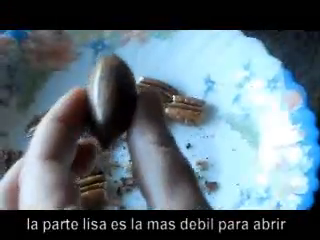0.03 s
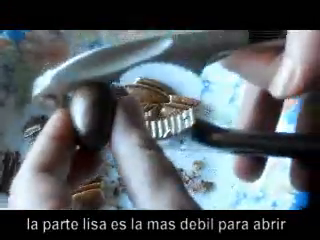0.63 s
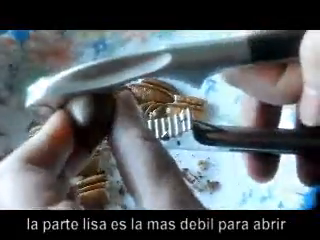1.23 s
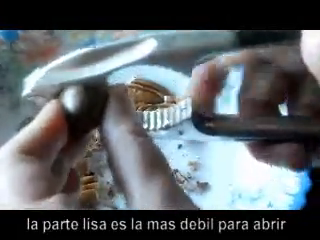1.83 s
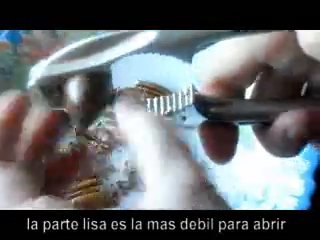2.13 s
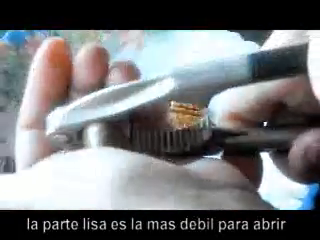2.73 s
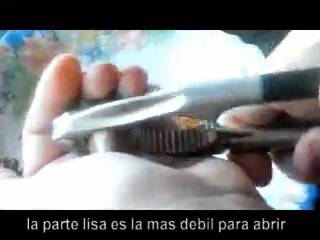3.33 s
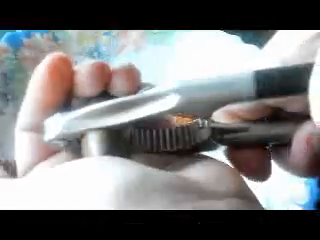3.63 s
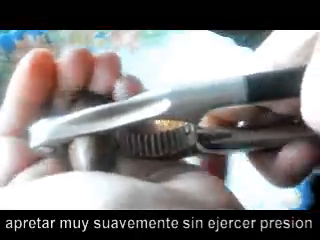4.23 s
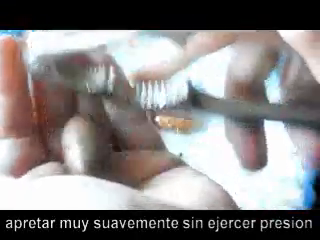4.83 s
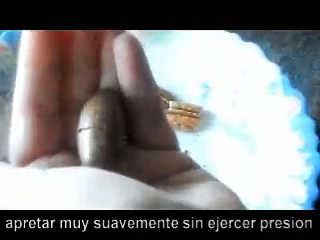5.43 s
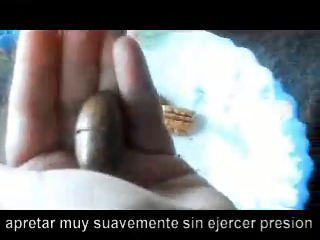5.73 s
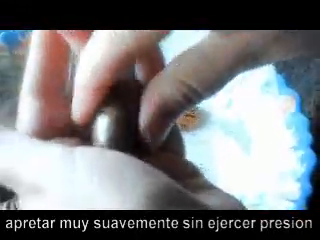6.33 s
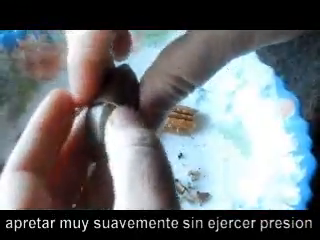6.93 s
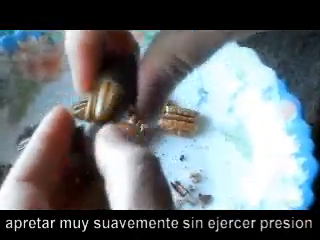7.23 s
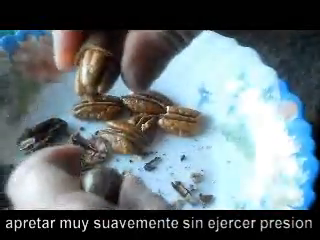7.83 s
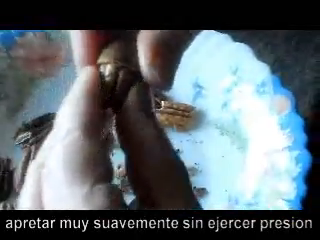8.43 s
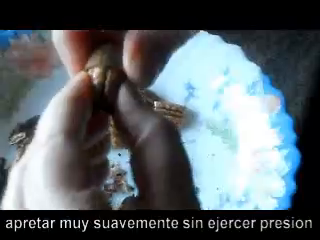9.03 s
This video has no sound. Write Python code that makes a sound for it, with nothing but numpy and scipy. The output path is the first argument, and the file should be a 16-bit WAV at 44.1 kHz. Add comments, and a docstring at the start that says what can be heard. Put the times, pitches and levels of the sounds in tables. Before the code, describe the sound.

A steady fan rush and electrical hum fill a small room, with everything else close to the microphone. At 0.5 seconds a metal nutcracker meets a pecan with a faint click and scrape. It clicks again near 2.1 seconds, and a very low rumble comes up and stays. At 3.3 seconds the shell breaks with a loud, sharp crack, followed by tiny splintering ticks and a second, smaller crack at 4 seconds. The steel arms clap shut, hard and short, at 5.2 seconds. The background dips after the big crack and the clap, then slowly recovers. From 5.6 to 6.1 seconds shell crumbs scrape and crackle softly, and a faint rub comes near 7.3 seconds. At 8 seconds a piece of shell bounces on a china plate with quick, light clinks. Two small shell snaps follow around 8.5 seconds.

```python
"""Cracking a pecan in a small room, close to a small camera's microphone, over a steady fan and mains hum.
The metal jaws meet the nut (0.5 s) and slip, a low rumble comes up, and the shell cracks (3.3 s) and
splinters. The steel arms clap shut (5.2 s); the camera's gain control ducks everything after the big
crack and the clap, holds, and recovers. The cracker is laid down among crumbs, fingers peel the shell,
and a piece bounces on a china plate (8 s)."""
import sys
import numpy as np
from scipy import signal
from scipy.fft import rfft, irfft
from scipy.io import wavfile
from scipy.ndimage import uniform_filter1d

SR = 44100
rng = np.random.default_rng(int(sys.argv[2]) if len(sys.argv) > 2 else 0)


def store_pcm(level_fs):
    """Save levels as 16-bit WAV."""
    pcm = np.round(np.clip(level_fs, -1, 1) * 32767).astype(np.int16)
    wavfile.write(sys.argv[1], SR, np.atleast_2d(pcm).T)


N = 400869
TIME = np.arange(N) / SR
# spectrum of breaking or rubbing shell: f/Hz, level/dB
SHELL_SPECTRUM = [(200, -5), (900, -3), (1400, 1.5), (1900, -6), (3000, -2.5), (4600, -6), (6800, -1),
                  (8500, -2.5), (10500, -6)]


def amp(db):
    """Decibels to gain."""
    return 10 ** (np.asarray(db) / 20)


def unit(x):
    """Scales to rms 1."""
    return x / np.sqrt(np.mean(x ** 2) + 1e-20)


def per_ms(x):
    """Scales a click to the energy of one millisecond at rms 1."""
    return x * np.sqrt(SR / 1000 / (np.sum(x ** 2) + 1e-20))


def read(points, hz, column=1):
    """Interpolates a table column on a log-frequency axis."""
    table = np.transpose(points)
    return np.interp(np.log(hz + 1), np.log(table[0] + 1), table[column])


def add(mix, start_s, sound):
    """Mixes a sound in at a time."""
    part = mix[round(start_s * SR):][:len(sound)]
    part += sound[:len(part)]


def colour(x, points):
    """Minimum-phase filter from rows of f/Hz, level/dB."""
    log_gain = np.log(amp(read(points, abs(np.fft.fftfreq(2048, 1 / SR)))))
    response = np.exp(np.conj(signal.hilbert(log_gain)))
    return signal.fftconvolve(x, np.fft.ifft(response).real)[:len(x)]


def cut(x, hz, kind, order=2):
    """High-pass or low-pass filter."""
    return signal.sosfilt(signal.butter(order, hz, kind, fs=SR, output="sos"), x)


def band(x, low_hz, top_hz, order=2):
    """Keeps what lies between two edges."""
    return cut(cut(x, low_hz, "highpass", order), top_hz, "lowpass", order)


def wander(rate_hz):
    """Slow random drift of rms 1."""
    hz = np.fft.rfftfreq(N, 1 / SR)
    return unit(irfft(rfft(rng.standard_normal(N)) * np.exp(-(hz / rate_hz) ** 2), N))


def ring(modes, size=16000):
    """Dying sines from rows of f/Hz, level/dB, t60/s."""
    t = np.arange(size) / SR
    return sum(amp(db - 60 * t / t60) * np.sin(2 * np.pi * hz * t) for hz, db, t60 in modes)


def burst(decay_ms, size=2048):
    """The dying noise of a fracture or a hit, with an even spectrum overall."""
    t_ms = np.arange(size) / SR * 1000
    fade = np.exp(-t_ms / decay_ms)
    spectrum = rfft(rng.standard_normal(size) * fade)
    return irfft(spectrum / abs(spectrum), size) * np.sqrt(fade)


def fan_air():
    """The steady rush of air from a fan."""
    # air noise: f/Hz, spectral density/dB
    spectrum = [(15, 2), (40, 9), (70, 1.5), (230, 4.5), (320, 9), (430, 3), (560, 3.5), (800, 0),
                (1150, 0.5), (1800, -3.5), (3200, -5), (6000, -8), (10000, -10)]
    gains = amp(read(spectrum, np.fft.rfftfreq(N, 1 / SR)))
    return unit(irfft(rfft(rng.standard_normal(N)) * gains, N))


def hum(waver_rad=0.21):
    """Mains hum and fan tones, each wavering in level and phase."""
    # steady tones: f/Hz, level/dB
    tones = [(50, -14), (100, -21.5), (150, -17), (251, -18.5), (300, -8), (350, -11), (543, -25.5),
             (646, -23.5)]
    out = np.zeros(N)
    for hz, db in tones:
        level = amp(db) * np.sqrt(2) * (1 + 0.33 * wander(4.2))
        out += level * np.sin(2 * np.pi * hz * TIME + waver_rad * wander(7))
    return out


def rumble(hz=21):
    """A very low drone of rms 1 with drifting phase."""
    return np.sqrt(2) * np.sin(2 * np.pi * hz * TIME + 0.81 * wander(1.5))


def room_tone(air_db=-38, hum_db=-38.5, rumble_db=-38, early_db=-9.5, swell_at_s=2.3, rise_s=0.13):
    """Fan and hum over a rumble that starts weak, comes up and stays."""
    early = 1 - np.clip((TIME - swell_at_s) / rise_s, 0, 1)
    return amp(air_db) * fan_air() + amp(hum_db) * hum() + amp(rumble_db + early_db * early) * rumble()


def room_tail(x, rise_s=0.0021):
    """The small room's short diffuse tail, whose top treble dies first."""
    # reverberation: f/Hz, level/dB, t60/s
    decay = [(300, -6.5, 0.22), (1200, 1.5, 0.15), (2200, -2.5, 0.17), (3300, 3.5, 0.13), (4800, -2.5, .2),
             (8030, -1, 0.17), (11000, 6, 0.077)]
    hz, t, spectra = signal.stft(rng.standard_normal(SR // 2), SR, nperseg=256)
    db, t60 = read(decay, hz)[:, None], read(decay, hz, column=2)[:, None]
    tail = signal.istft(spectra * amp(db - 60 * t / t60), SR, nperseg=256)[1]
    tail *= 1 - np.exp(-(np.arange(len(tail)) / SR / rise_s) ** 2)
    return signal.fftconvolve(x, tail / np.linalg.norm(tail))[:N]


def with_echoes(x):
    """The direct sound, plus what the table and nearby things throw back at the microphone."""
    # first reflections: delay/s, level/dB
    reflections = [(.0027, -16.5), (.0036, -17.5), (.0072, -29), (0.015, -19.5)]
    out = x.copy()
    for delay, db in reflections:
        add(out, delay, amp(db) * x)
    return out


def rubs(grains_per_s=2500, spread_db=4.5, ring_t60=0.0044):
    """Shell edges, crumbs and jaws stick and slip in tiny grains; the fingers damp the ring."""
    # rubbing strokes: t/s, length/s, level/dB, ring f/Hz, ring share/dB
    strokes = [(0.492, 0.12, -41.5, 1090, 19), (4.041, .025, -25, 3120, 8), (4.849, 0.048, -41.5, 3470, 13),
               (4.893, 0.021, -43, 3700, 14), (5.616, 0.036, -26.5, 890, 0),
               (5.695, 0.074, -28.5, 1300, -5.5), (5.796, 0.055, -28.5, 1400, -1.5),
               (5.845, 0.023, -27, 1170, 2), (5.708, 0.046, -28, 4200, -6), (5.815, 0.068, -32, 3630, -2),
               (5.874, .015, -22, 1030, -4.5), (6.111, 0.011, -34, 1140, 19), (7.251, 0.055, -38, 3040, -1),
               (8.068, 0.13, -41, 920, 10)]
    out = np.zeros(N)
    for s, length, db, ring_hz, ring_db in strokes:
        n = int(length * SR)
        heights = rng.standard_normal(SR)[:n]
        slips = rng.random(SR)[:n] < grains_per_s / SR
        sizes = np.minimum(rng.exponential(1, SR)[:n], 3)
        grains = heights * slips * amp(spread_db * sizes) * signal.windows.tukey(n, 0.6)
        fizz = unit(cut(colour(grains, SHELL_SPECTRUM), ring_hz, "highpass"))
        hollow = unit(signal.fftconvolve(grains, ring([(ring_hz, 0, ring_t60)], size=1024))[:n])
        add(out, s, amp(db) * unit(fizz + amp(ring_db) * hollow))
    return out


def plate_bounces(tick_db=-5, pivot_hz=6000):
    """A bouncing piece of shell ticks, rings the china and rocks the plate; sharp corners ring brighter."""
    # landings: t/s, level/dB, tilt about the pivot/(dB per octave), thud level/dB
    bounces = [(8.0275, -28, -8, -33), (8.0292, -17, 9, -23), (8.061, -40, 26, -50),
               (8.0734, -16.5, 2, -27.5), (8.0942, -31, -10, -40), (8.1121, -19, 7, -28.5),
               (8.1275, -31, 38, -31), (8.182, -40, 9, -37)]
    # ringing china: f/Hz, level/dB, t60/s
    china_modes = [(2120, -25, 0.17), (2250, -22, 0.18), (3100, -29, 0.13), (3620, -4.5, 0.027),
                   (3860, -5, 0.068), (3920, -12, 0.13), (4540, -9, 0.017), (6165, 1, 0.07),
                   (6150, -14, 0.1), (6400, -20, .03), (7540, -23, .11), (9330, -18.5, 0.037)]
    # the plate rocking on the table: f/Hz, level/dB, t60/s
    thud_modes = [(463, -15, 0.087), (537, -2, 0.084), (724, -13, 0.066), (905, 1, 0.018),
                  (1120, -10.5, 0.043)]
    out = np.zeros(N)
    for s, db, tilt_db, thud_db in bounces:
        tilted = [(hz, level + tilt_db * np.log2(hz / pivot_hz), t60) for hz, level, t60 in china_modes]
        tick = per_ms(band(burst(decay_ms=5), 3700, 6500, order=4))
        add(out, s, amp(db) * ring(tilted) + amp(thud_db) * ring(thud_modes))
        add(out, s, amp(db + tick_db) * tick)
    return out


def jaw_knocks():
    """The toothed jaws meet the nut, slip and jolt as it gives; the handles ring briefly in the hand."""
    # contacts: t/s, click level/dB, click low f/Hz, click top f/Hz, ring level/dB, ring f/Hz, t60/s
    contacts = [(.4908, -22, 1000, 3300, -18, 1230, 0.025), (0.501, -31, 900, 2500, -32, 1050, 0.11),
                (2.138, -18, 2000, 11000, -33, 2430, 0.11), (2.1441, -29, 600, 8000, -19.5, 1352, 0.083),
                (3.314, 12, 1500, 2400, 20, 1400, 0.0093)]
    out = np.zeros(N)
    for s, click_db, low_hz, top_hz, ring_db, ring_hz, t60 in contacts:
        add(out, s, amp(click_db) * per_ms(band(burst(decay_ms=6.4), low_hz, top_hz)))
        add(out, s, ring([(ring_hz, ring_db, t60)]))
    return out


def arm_clap(tick_db=-9, contact_s=0.0003, ring_room_db=-28, tick_room_db=-9):
    """Steel meets steel: a hard tick and a ring the hand chokes; returns close sound and room feed."""
    # the arms clap shut: t/s, level/dB
    hits = [(5.1799, 22.5), (5.1827, 11), (5.186, 5)]
    # steel arms damped by the hand: f/Hz, level/dB, t60/s
    arm_modes = [(680, -23, 0.0051), (1060, -6.5, 0.0026), (1580, -8.5, 0.00345), (2600, -2, 0.003),
                 (3130, 2.5, 0.0018), (4740, 1.5, 0.0087), (5020, -16, 0.011), (6590, -9.5, 0.012),
                 (7340, -9.5, 0.012), (8350, 7, 0.003), (9300, -5, 0.0068)]
    # their free ends ring on faintly: f/Hz, level/dB, t60/s
    tip_modes = [(4700, -44, 0.22), (4800, -42, .22)]
    close, feed = np.zeros(N), np.zeros(N)
    build_up = 1 - np.exp(-np.arange(2048) / SR / contact_s)
    steel = ring(arm_modes, size=2048) * build_up
    steel = cut(steel, 380, "highpass", order=4)  # thin arms radiate no bass
    for s, db in hits:
        tick = amp(tick_db) * per_ms(cut(burst(decay_ms=0.87), 6500, "highpass", order=4))
        add(close, s, amp(db) * (steel + tick))
        add(close, s, amp(db) * ring(tip_modes))
        add(feed, s, amp(db + ring_room_db) * steel + amp(db + tick_room_db) * tick)
    return close, feed


def shell_cracks(ring_t60=0.0045):
    """Each fracture snaps, rings the hollow shell and gives the air a soft push."""
    # shell and crumbs breaking: t/s, level/dB, ring f/Hz, ring share/dB, snap low f/Hz
    fractures = [(3.221, -7, 6760, -3, 3500), (3.2324, -4, 5376, -5, 4440), (3.301, -5.5, 7000, -1, 3800),
                 (3.314, 31, 3270, -6, 1492), (3.3202, 17, 6450, -13, 4760), (3.465, -6, 6560, -16, 3600),
                 (3.4776, -10.5, 7550, -1, 2980), (3.7256, -5, 6890, -12.5, 2387),
                 (3.7782, -3.5, 7730, -2, 2600), (3.8676, -4.5, 6950, -16, 2360),
                 (3.9, -9.5, 8000, -0.5, 3010), (3.9832, 15, 3070, -4.5, 2200),
                 (3.984, 12.5, 7200, -2, 2580), (3.9903, 14.5, 3320, -7, 2920),
                 (4.0362, 12, 7030, -6, 6250), (4.117, -15, 3100, -3, 2410), (4.3072, -11, 4270, -11, 2390),
                 (4.3277, -15, 6870, -11, 3490), (4.902, -36, 3570, 1, 3000),
                 (4.909, -23.5, 3700, 15, 3050), (5.6216, -9, 3840, -6, 2000),
                 (5.797, -18.5, 5630, -6, 4600), (5.806, -16, 6000, -2, 4600), (5.824, -14, 3700, -3, 2000),
                 (5.8512, -11, 4970, -5, 2200), (5.8791, -3.5, 3860, -2.5, 2400),
                 (6.1124, -11.5, 5860, -13, 2230), (8.475, -20, 3720, -3, 2580),
                 (8.6176, -8, 4170, -3, 3900)]
    out = np.zeros(N)
    for s, db, ring_hz, ring_db, low_hz in fractures:
        tear_ms = 3.7 * (3370 / ring_hz) ** 0.47  # a larger piece rings lower and tears for longer
        tear = colour(burst(tear_ms), SHELL_SPECTRUM)
        snap = per_ms(cut(tear, low_hz, "highpass", order=4))
        hollow = per_ms(ring([(ring_hz, 0, ring_t60)], size=2048))
        hollow = amp(ring_db) * cut(hollow, 0.88 * ring_hz, "highpass", order=4)
        push_db = -25 - 7 * np.log2(low_hz / 3000)  # small splinters have no bass and push less air
        push = amp(push_db) * per_ms(band(tear, 900, 2000))
        add(out, s, amp(db) * per_ms(snap + hollow + push))
    return out


def scene(shell_room_db=-12.5, rub_room_db=-9, jaw_room_db=-19, plate_room_db=-11):
    """Nut, cracker and plate close to one microphone, with the small room behind them."""
    shell = shell_cracks()
    arms, feed = arm_clap()
    rubbing, jaws, china = rubs(), jaw_knocks(), plate_bounces()
    feed += amp(shell_room_db) * shell + amp(rub_room_db) * rubbing
    feed += amp(jaw_room_db) * jaws + amp(plate_room_db) * china
    close = with_echoes(shell + rubbing) + jaws + arms + china
    return (close + room_tail(feed) + room_tone())[None]


def gain_control(x, ceiling_db=-19, overload_db=-11, hold_s=0.643, creep_db_per_s=2, recovery_s=0.86):
    """Gain drops at once for a loud midrange; after an overload it only creeps up, then recovers freely."""
    hop = 44
    step_s = hop / SR
    power = uniform_filter1d(band(x, 300, 3000) ** 2, SR // 100)
    levels = np.sqrt(abs(power) + 1e-12)[::hop]
    ceiling, overload, creep = amp(ceiling_db), amp(overload_db), amp(creep_db_per_s * step_s)
    gain, held_until_s = amp(-7.5), 0.72  # the gain starts out held down
    gains = []
    for s, level in zip(TIME[::hop], levels):
        if level > overload:
            held_until_s = s + hold_s
        gain = gain * creep if s < held_until_s else gain + (1 - gain) * step_s / recovery_s
        gain = min(gain, ceiling / level, 1)
        gains.append(gain)
    return np.interp(TIME, TIME[::hop], gains)


def record(dry, stray_hum_db=-73, stray_rumble_db=-59, clip_level=0.93, top_hz=15800):
    """The camera samples at half rate, its gain control ducks, and the loudest peaks clip."""
    # the camera's treble roll-off: f/Hz, level/dB
    treble = [(8000, 0), (10500, -1), (12500, -1.5), (15000, -3), (16000, -0.5)]
    half_rate = signal.oaconvolve(dry[0], signal.firwin(81, 10750, fs=SR), "same")[::2]
    # straight-line upsampling mirrors the treble
    mirrored = np.interp(np.arange(N), 2 * np.arange(len(half_rate)), half_rate)
    softened = colour(mirrored, treble)
    ducked = softened * gain_control(softened)
    # a little hum and rumble stay even at the lowest gain
    stray = amp(stray_hum_db) * hum() + amp(stray_rumble_db) * rumble()
    clipped = np.clip(ducked + stray, -clip_level, clip_level)
    band_limit = signal.firwin(301, top_hz, window=("kaiser", 9), fs=SR)
    return signal.oaconvolve(clipped, band_limit, "same")[None]


dry = scene()
out = record(dry)
store_pcm(out)
```